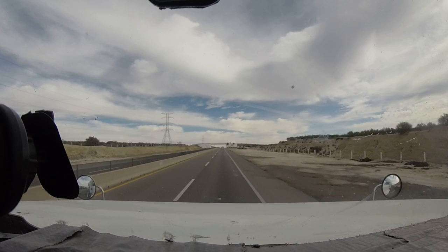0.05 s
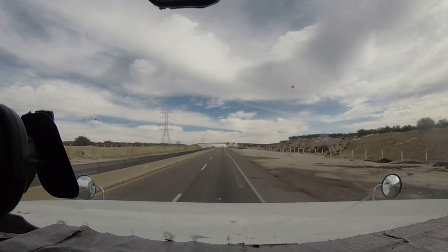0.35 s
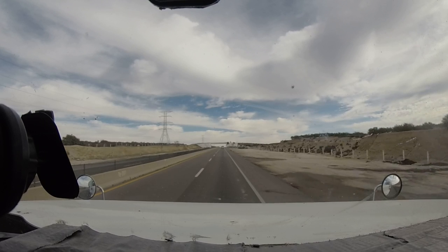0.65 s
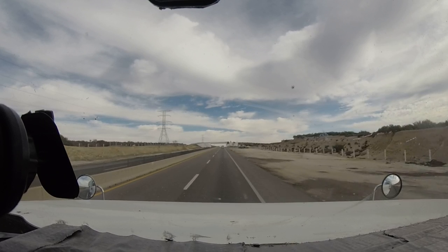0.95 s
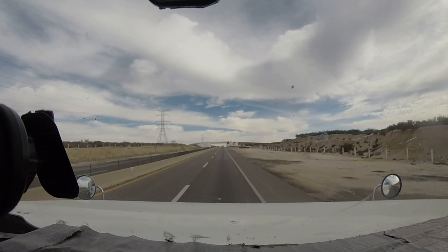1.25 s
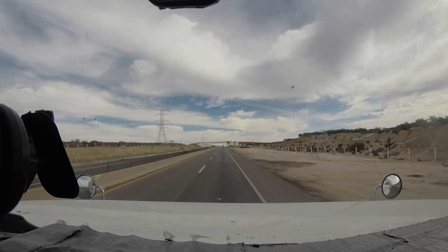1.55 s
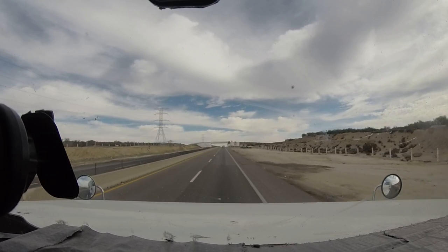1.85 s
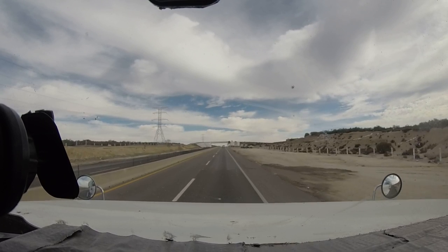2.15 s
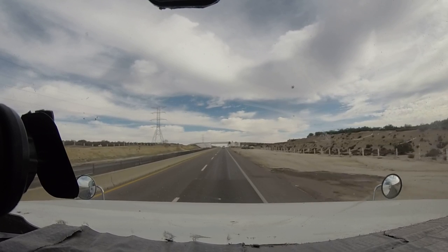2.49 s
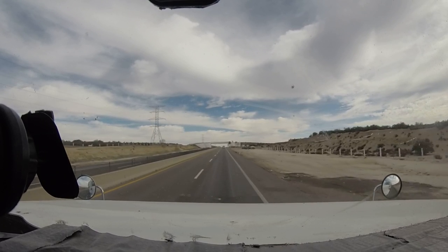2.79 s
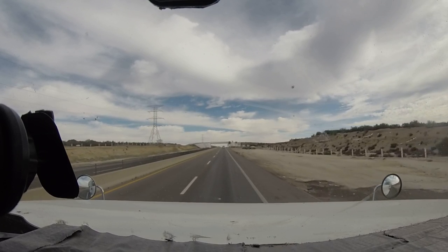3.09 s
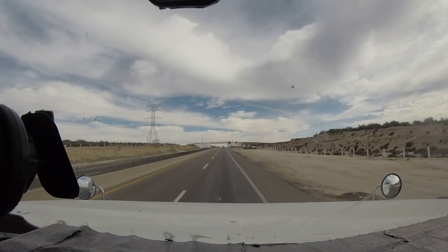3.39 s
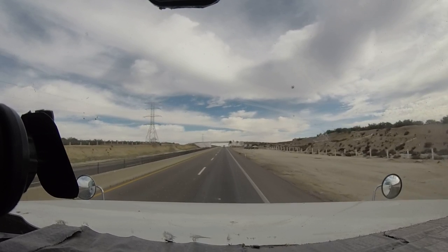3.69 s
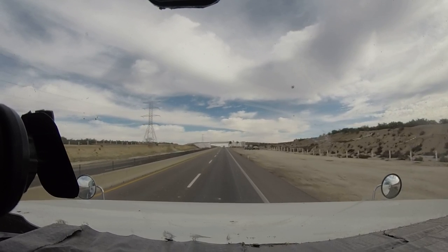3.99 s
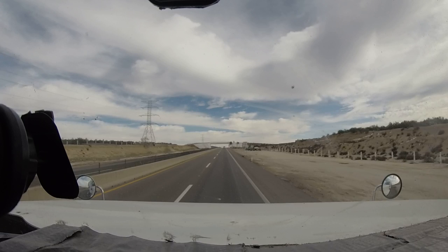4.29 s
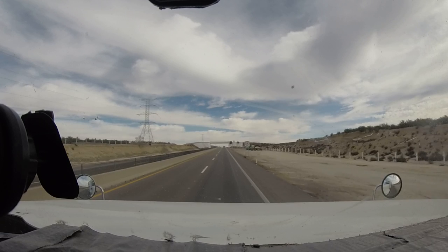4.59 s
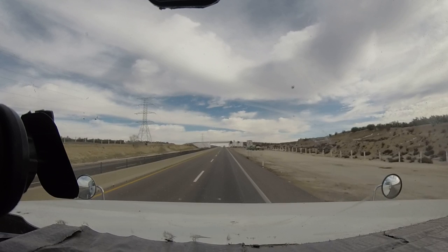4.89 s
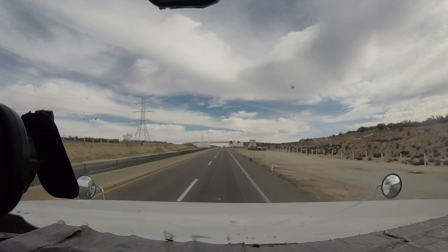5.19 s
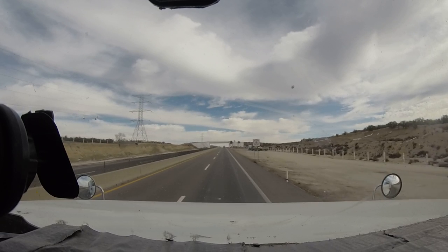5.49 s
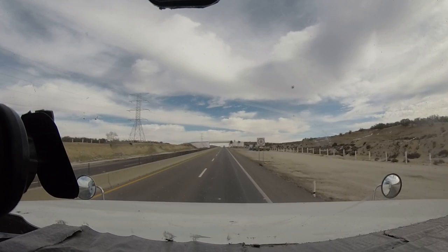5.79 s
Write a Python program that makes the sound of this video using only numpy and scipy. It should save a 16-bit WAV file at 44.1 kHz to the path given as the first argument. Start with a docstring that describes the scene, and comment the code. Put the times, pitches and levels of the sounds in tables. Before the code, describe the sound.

Inside a truck on a highway, a throbbing diesel pulls, chuffs through a gear change and resumes lower, with light trim rattles.

```python
"""A six-cylinder diesel throbs under load, heard from inside the cab of a heavy truck.
Its harmonics and combustion noise excite resonances of the cab, under the thin whistle of turbo blades.
For an upshift the fuel is cut, the engine brake chuffs through the exhaust pipe and the turbo runs down;
then the engine pulls again, slower. Loose trim ticks, rattles and squeaks, and underneath
the road rumbles, the tyres roar and air hisses."""
import sys
import numpy as np
from scipy import signal
from scipy.fft import rfft, irfft
from scipy.io import wavfile
from scipy.ndimage import uniform_filter1d

SR = 44100
rng = np.random.default_rng(int(sys.argv[2]) if len(sys.argv) > 2 else 0)


def store_pcm(level_fs):
    """Save levels as 16-bit WAV."""
    pcm = np.round(np.clip(level_fs, -1, 1) * 32767).astype(np.int16)
    wavfile.write(sys.argv[1], SR, np.atleast_2d(pcm).T)


N = 266805
TIME_S = np.arange(N) / SR

CYLINDERS = 6
LOW_GEAR_HZ, HIGH_GEAR_HZ = 72.92, 64.45  # firing rate at the start of each gear
CUT_S, RESUME_S = 4.07, 4.8  # fuel off, fuel on again


def engine_hum(cycle, firing_hz):
    """Harmonics of the engine cycle swell near the cab's air modes; orders 5 and 6 beat into a throb."""
    # strong harmonics: multiple of the cycle rate
    strong_orders = (5, 6, 12, 36)
    # their strengths before resonance: level_db, fuel_cut_change_db, high_gear_change_db, cut_fade_s
    strong_levels = [(-31.5, 5, -2.5, 0.16), (-24, -19, -2.5, 0.034), (-32.5, -12.5, -2.5, 0.22),
                     (-42.5, -4, -2.5, .3)]
    # weak harmonics from unequal cylinders: multiple of the cycle rate
    weak_orders = (2, 3, 4, 7, 9, 10, 14, 15, 16, 17, 18, 19, 20, 24)
    # their strengths under power: low_gear_db, high_gear_db
    weak_levels = [(-56.5, -35), (-47, -44), (-33, -36.5), (-44, -40), (-34.5, -29), (-33.5, -40),
                   (-36.5, -32), (-49, -31), (-50, -42.5), (-41, -47), (-40, -27.5), (-47, -43), (-43, -42),
                   (-34, -43.5)]
    # air resonances of the cab: centre_hz, width_hz, lift_db
    cab_modes = [(62.2, 21.3, 9), (147, 35, 16), (445.6, 28, 18.5)]
    shifted, cycle_hz = high_gear(), firing_hz / CYLINDERS
    strong, weak = np.zeros(N), np.zeros(N)
    for order, (db, cut_db, shift_db, fade_s) in zip(strong_orders, strong_levels):
        source_db = db + cut_db * fuel_cut(fade_s) + shift_db * shifted
        boom_db = resonance_db(order * cycle_hz, cab_modes)
        strong += gain_of(source_db + boom_db) * harmonic(order * cycle, waver_db=.5)
    for order, (low_db, high_db) in zip(weak_orders, weak_levels):
        level_db = low_db + (high_db - low_db) * shifted
        weak += gain_of(level_db) * harmonic(order * cycle + rng.random(), waver_db=2)
    return strong + gain_of(-10 * fuel_cut()) * weak


def combustion_roar(cycle):
    """Forced vibration: combustion noise, partly alike in every cycle, pulses and rings the cab panels."""
    # combustion spectrum: frequency_hz, relative_db
    spectrum = [(60, -2.5), (115, -4), (165, -4.5), (220, 4), (270, -6), (340, 2), (400, -4), (470, -9),
                (540, -3), (740, -5.5), (1000, -9.5), (1200, -11), (1450, -16), (2000, -31), (4000, -50)]
    # panel resonances: centre_hz, width_hz, low_gear_lift_db, high_gear_lift_db
    panels = [(207, 38, 1.5, 3.5), (619, 44, 1.5, 3), (734, 34, 6, 3.5), (863, 63, 12.5, 11.5),
              (919.6, 20, 9.5, 9.5), (1045, 34, 4, 4.5), (1416, 200, 2, 4)]
    points, repeat_share = 3600, .37  # noise points per cycle; share of the power that repeats
    pattern = unit_rms(np.interp(cycle % 1 * points, np.arange(points), rng.standard_normal(points)))
    drive = np.sqrt(repeat_share) * pattern + np.sqrt(1 - repeat_share) * noise()
    drive *= 3.2 + firings(cycle, decay=.6, uneven_db=2.2)
    low = colour(drive, spectrum, [(hz, width, db) for hz, width, db, _ in panels])
    high = colour(drive, spectrum, [(hz, width, db) for hz, width, _, db in panels])
    return low + (high - low) * high_gear()


def firings(cycle, decay, uneven_db):
    """Pulse envelope: each cylinder's blow has its own strength and decays over a share of its stroke."""
    strength = gain_of(uneven_db * unit_rms(noise(CYLINDERS)))
    count = cycle * CYLINDERS
    return unit_rms(strength[count.astype(int) % CYLINDERS] * np.exp(-(count % 1) / decay))


def firing_rate():
    """Firings per second follow crankshaft speed, climbing in each gear and dropping between them."""
    low_climb, drop, high_climb = 1.35, 24, .9  # Hz per s
    low = LOW_GEAR_HZ + low_climb * TIME_S - drop * since(CUT_S)
    return np.maximum(low, HIGH_GEAR_HZ + high_climb * since(RESUME_S))


def fuel_cut(fade_s=.12):
    """A ramped gate: one while the fuel is off for the shift, zero under power."""
    resume_fade_s = .5
    return np.minimum(since(CUT_S) / fade_s, 1) - np.minimum(since(RESUME_S) / resume_fade_s, 1)


def high_gear():
    """Crossfade weight: zero in the low gear, near one at the engine's high-gear speed."""
    return np.clip((LOW_GEAR_HZ - firing_rate()) / (LOW_GEAR_HZ - HIGH_GEAR_HZ), 0, 1)


def engine_brake(cycle):
    """A falling pipe resonance turns a whoosh into a thump, among smaller puffs and a gasp of air."""
    # main exhaust burst: time_s, pitch_hz, level_db
    whoosh = [(4.3, 460, -90), (4.35, 440, -29), (4.425, 400, -25), (4.45, 360, -15.5), (4.467, 265, -17),
              (4.49, 188, -10.5), (4.515, 150, -17), (4.56, 115, -20), (4.6, 100, -36), (4.65, 110, -90)]
    # exhaust puffs: centre_s, level_db, pitch_hz, half_length_s, sag_octaves_per_s, note_over_flutter_db
    puffs = [(4.255, -22.5, 430, .05, 1, -3), (4.41, -26, 640, .03, 4, -6), (4.497, -20, 300, .03, 4, -3),
             (4.48, -21, 115, .04, 3, -3), (4.568, -23, 450, .014, 2, 3), (4.603, -21, 205, 0.03, 1, 4),
             (4.812, -15, 100, .035, 5, 0)]
    # spectrum of the released air: frequency_hz, relative_db
    gasp_spectrum = [(1000, -15), (2500, 0), (4500, 0), (6500, -5), (9000, -10), (11000, -17), (13500, -22),
                     (15000, -40)]
    drive = (1 + firings(cycle, decay=.3, uneven_db=2)) * noise()
    sweep_hz, sweep_db = curves(whoosh)
    exhaust = gain_of(sweep_db) * pipe_note(drive, sweep_hz, note_db=5)
    for centre_s, db, pitch_hz, half_s, sag, note_db in puffs:
        offset_s = np.clip(TIME_S - centre_s, -2 * half_s, 2 * half_s)
        puff = pipe_note(drive, pitch_hz * 2 ** (-sag * offset_s), note_db)
        exhaust += gain_of(db) * bell(centre_s, half_s) * puff
    gasp = gain_of(-47.5) * bell(centre_s=4.468, half_s=.06) * colour(noise(), gasp_spectrum)
    return exhaust + gasp


def pipe_note(drive, hz, note_db):
    """Exhaust pulses excite a moving pipe resonance: a dull flutter around a clear note."""
    flutter = resonate(resonate(drive, hz, width_hz=190), hz, width_hz=150)
    flutter = low_pass(flutter, top_hz=1200)
    flutter /= np.sqrt(uniform_filter1d(flutter ** 2, size=900) + 1e-12)  # steadies the level
    note = gain_of(note_db) * np.sqrt(2) * np.sin(2 * np.pi * (np.cumsum(hz) / SR + rng.random()))
    return unit_rms(flutter + note)


def turbo():
    """Two wheels on one shaft whistle at their blade-passing rates, over the air in the intake."""
    # compressor tone as the shaft climbs, coasts, is kicked by the brake and spools up: time_s, pitch_hz
    blade_tone = [(0, 8005), (1.5, 8185), (2.5, 8275), (3.55, 8335), (4.09, 8195), (4.2, 7620), (4.3, 7090),
                  (4.4, 6650), (4.46, 6560), (4.51, 6720), (4.58, 6230), (4.7, 5800), (5, 5170),
                  (5.15, 4950), (5.35, 4840), (5.55, 4940), (5.8, 5200), (6.05, 5520)]
    # whistle strengths: time_s, compressor_db, turbine_db
    levels = [(0, -64, -84), (.45, -60, -82), (.75, -62, -82), (1.5, -56.5, -81), (2.7, -58, -80),
              (3.1, -60.5, -80), (3.45, -56, -78.5), (3.85, -56.5, -79), (4.2, -59, -75.5),
              (4.45, -60, -72.5), (4.75, -63.5, -73), (5, -63, -76), (5.2, -63, -70), (5.55, -61.5, -67),
              (6.05, -60, -71)]
    compressor_blades, turbine_blades = 6, 10
    compressor_db, turbine_db = curves(levels)
    shaft_hz = curves(blade_tone)[0] / compressor_blades
    boost = shaft_hz / shaft_hz.max()
    jitter = .0003 + .007 * (1 - boost)  # the shaft is less steady as boost is lost
    shaft_hz *= 1 + jitter * drift(rate_hz=45)
    shifted = high_gear()
    compressor = whistle(compressor_blades * shaft_hz, .5 + .5 * fuel_cut() + .8 * shifted, width_hz=230)
    turbine = whistle(turbine_blades * shaft_hz, breath=5 - 3.5 * shifted, width_hz=420)
    return gain_of(compressor_db) * compressor + gain_of(turbine_db) * turbine + intake(boost)


def whistle(hz, breath, width_hz):
    """A blade tone in a breathy noise band fades in and out as the shaking cab shifts its echoes."""
    fading = 1 + .42 * drift(rate_hz=14)
    tone = unit_rms(np.sin(2 * np.pi * np.cumsum(hz) / SR) * fading)
    skirt = unit_rms(resonate(resonate(noise(), hz, width_hz), hz, width_hz))
    return (tone + breath * skirt) / np.sqrt(1 + breath ** 2)


def intake(boost):
    """Flow noise grows with turbo speed, and the intake pipe resonates as the boost escapes."""
    # spectrum of the rushing boost air: frequency_hz, relative_db
    spectrum = [(2500, -21), (4000, -1.5), (4800, 4), (5700, -8), (6800, -0.5), (8000, -4.5), (8900, -9),
                (9400, -9), (10500, -16.5), (12500, -24.5), (13700, -20), (15000, -28.5)]
    rush = gain_of(-58.5 + 25 * np.log10(boost)) * colour(noise(), spectrum)
    surge = swell(peak_s=4.6, rise_s=.15, fall_s=.1)  # just after the brake bites
    escape = gain_of(-58) + gain_of(-53.5) * (1 - boost) + gain_of(-54) * surge
    return rush + escape * unit_rms(band(noise(), hz=3235, octaves=.045))


def trim_ticks():
    """Impacts on hard plastic: each gives a brief crack and excites damped modes."""
    # impacts: start_s, level_db, tilt_db_per_octave
    ticks = [(3.199, -40, 3), (3.212, -30.5, 6), (3.636, -31, 0), (4.161, -39, 5), (4.331, -37, -1),
             (4.504, -33.5, 2), (4.537, -38, -1), (4.597, -38, 0), (4.795, -41, -2), (4.9145, -22.5, -5),
             (5.034, -34, -4), (5.199, -32, 3), (5.380, -34, -2), (5.510, -32.5, -3)]
    # modes of the plastic: pitch_hz, relative_db, t60_s
    modes = [(1800, 0, .014), (2120, 3.5, .017), (2390, 0, .018), (2700, -5, .014), (3050, -6, .012),
             (3420, -1, .014), (3680, 1.5, .016), (4200, -8, .011), (5000, -9.5, .01), (5900, -14, .008),
             (7600, -17, .009), (9300, -26, .008)]
    out, t = np.zeros(N), TIME_S[:SR // 8]
    attack = 1 - np.exp(-t / .0002)
    for start_s, db, tilt in ticks:
        ring = np.zeros(len(t))
        for hz, mode_db, t60_s in modes:
            envelope = gain_of(mode_db + tilt * np.log2(hz) - 60 * t / t60_s)
            detuned_hz = hz * rng.uniform(.923, 1.03)
            ring += envelope * np.sin(2 * np.pi * detuned_hz * t) * rng.choice([-1, 1])
        crack = unit_rms(band(noise(len(t)), hz=3100 * 2 ** (tilt / 12), octaves=.55))
        tick = gain_of(3.5) * ring / abs(ring).max() + gain_of(-6) * crack * np.exp(-t / .0025)
        add(out, start_s, gain_of(db) * tick * attack)
    return out


def trim_rattles():
    """Clumps of tiny random impacts excite the resonances of loose trim."""
    # bursts of shaking: start_s, level_db, length_s, centre_hz, top_hz
    rattles = [(0.991, -44.5, .025, 5000, 10000), (1.073, -43, 0.019, 4770, 10000),
               (1.423, -48, .02, 5000, 9000), (1.519, -49, 0.023, 5200, 9000),
               (1.55, -46, 0.022, 5200, 9000), (2.637, -42, 0.038, 4700, 9500),
               (3.213, -46, .012, 8500, 15000), (3.383, -44, 0.037, 4800, 10000),
               (3.461, -43, 0.031, 2100, 10000), (3.53, -48, .02, 5000, 10000),
               (3.57, -44, .025, 5200, 10000), (3.63, -43, .025, 3400, 10000),
               (3.977, -39, 0.04, 5000, 10100), (4.034, -38.5, 0.038, 4400, 11000),
               (4.078, -31.5, 0.019, 5440, 11500), (4.104, -45, 0.014, 11000, 13000),
               (4.121, -46.5, 0.032, 8000, 12000), (4.248, -41, 0.03, 5360, 9800),
               (5.424, -47, 0.02, 6000, 8200), (5.642, -45, 0.015, 7000, 9800),
               (5.836, -46, .026, 5600, 8500), (5.893, -42, 0.017, 4370, 8500),
               (5.915, -43, 0.024, 6000, 10000)]
    # resonances of the loose parts: centre_hz, width_hz, lift_db
    rings = [(3880, 340, 8), (4860, 400, 6), (7160, 700, 5), (9400, 500, 2)]
    spectrum = [(3000, 11), (9000, -2.5), (11000, -3.5), (15000, -14.5)]  # frequency_hz, relative_db
    impacts_per_s = 4000
    out, t = np.zeros(N), TIME_S[:SR // 8]
    for start_s, db, length_s, centre_hz, top_hz in rattles:
        impacts = noise(len(t)) * (rng.random(len(t)) < impacts_per_s / SR)
        grains = low_pass(band(impacts, centre_hz, octaves=1), top_hz)
        rise = t / (length_s * .35)
        add(out, start_s, gain_of(db) * colour(grains, spectrum, rings) * rise * np.exp(1 - rise))
    return out


def trim_squeaks():
    """Narrow-band noise in very short bursts is heard as small pitched squeaks of the trim."""
    # squeaks: start_s, level_db
    squeaks = [(.44, -50), (.97, -52), (1.92, -53), (2.87, -54), (3.495, -44), (3.657, -49), (3.745, -43),
               (3.905, -46), (4.197, -47)]
    out, t = np.zeros(N), TIME_S[:SR // 8]
    envelope = np.exp(-((t - .005) / .0028) ** 2)
    for start_s, db in squeaks:
        squeak = unit_rms(band(noise(len(t)), hz=6680, octaves=.05))
        add(out, start_s, gain_of(db) * squeak * envelope)
    return out


def road():
    """Surface roughness shakes the cab into a rumble and, less steeply, raises the roar of the tyres."""
    # roughness of the surface: time_s, rumble_db
    roughness = [(0, -32), (.6, -22.5), (1.5, -25), (3, -23), (3.7, -18.5), (4.7, -19.5), (6.05, -22)]
    # spectrum of the shaking cab: frequency_hz, relative_db
    rumble_spectrum = [(5, -33.5), (10, -6.5), (20, 4.5), (35, -1), (56, 6), (80, 0), (120, -1.5),
                       (165, -7), (210, -3), (260, -18), (400, -39), (900, -78.5)]
    # spectrum of the rolling tyres: frequency_hz, relative_db
    tyre_spectrum = [(150, -20), (220, -16), (280, 0.5), (380, 2), (455, 8), (540, -1.5), (630, -0.5),
                     (800, -5), (980, -8), (1120, -6.5), (1350, -23.5), (1700, -34.5), (4000, -63)]
    rumble_db, = curves(roughness)
    tyre_db = -26 + .52 * (rumble_db - rumble_db.mean())
    rumble = gain_of(rumble_db) * colour(noise(), rumble_spectrum)
    return rumble + gain_of(tyre_db) * colour(noise(), tyre_spectrum)


def air_hiss(cycle):
    """Broadband air noise flickers, lightly amplitude-modulated by each firing."""
    # spectrum of the air noise: frequency_hz, relative_db
    spectrum = [(700, -19), (1400, -4), (1800, 5), (2100, -0.5), (2600, 0), (2950, -7.5), (3500, -6),
                (4300, -12.5), (4800, -14), (6000, -18), (7800, -25), (10000, -32.5), (12500, -38),
                (15000, -56.5)]
    air = unit_rms(noise() * (5 + firings(cycle, decay=.3, uneven_db=5)))
    return colour(air * gain_of(.5 * drift(rate_hz=25)), spectrum)


def harmonic(turns, waver_db):
    """A sinusoid with slow random amplitude modulation."""
    return np.sqrt(2) * np.cos(2 * np.pi * turns) * gain_of(waver_db * drift(rate_hz=4.9))


def resonance_db(hz, peaks):
    """Summed lift of bell-shaped resonance peaks at the frequencies hz."""
    return sum(lift_db / (1 + (2 * (hz - centre) / width) ** 2) for centre, width, lift_db in peaks)


def colour(x, spectrum, peaks=()):
    """Spectral shaping with resonant peaks and a steep roll-off past the last point, at unit rms."""
    hz = np.fft.rfftfreq(len(x), 1 / SR)
    point_hz, point_db = np.transpose(spectrum)
    shape_db = np.interp(np.log(hz + 1), np.log(point_hz + 1), point_db)
    shape_db -= 60 * np.log10(np.maximum(hz / point_hz[-1], 1))
    return unit_rms(irfft(rfft(x) * gain_of(shape_db + resonance_db(hz, peaks)), len(x)))


def resonate(x, hz, width_hz):
    """A resonator of unit gain whose centre frequency moves."""
    carrier = np.exp(2j * np.pi * np.cumsum(hz) / SR)
    pole = np.exp(-np.pi * width_hz / SR)
    return 2 * (carrier * signal.lfilter([1 - pole], [1, -pole], x / carrier + 1e-18)).real


def band(x, hz, octaves):
    """A Gaussian band-pass on a log-frequency axis."""
    bin_hz = np.fft.rfftfreq(len(x), 1 / SR) + 1
    return irfft(rfft(x) * np.exp(-.5 * (np.log2(bin_hz / hz) / octaves) ** 2), len(x))


def low_pass(x, top_hz, order=10):
    """Rolls off by 6 dB per octave per order above top_hz."""
    hz = np.fft.rfftfreq(len(x), 1 / SR)
    return irfft(rfft(x) / (1 + (hz / top_hz) ** order), len(x))


def drift(rate_hz):
    """Low-passed noise: a random wandering of unit rms."""
    return unit_rms(low_pass(noise(), rate_hz, order=4))


def noise(samples=N):
    """Gaussian white noise."""
    return rng.standard_normal(samples)


def curves(rows):
    """Linear interpolation of each column of a timed table to the sample rate."""
    time_s, *columns = np.transpose(rows)
    return [np.interp(TIME_S, time_s, column) for column in columns]


def since(start_s):
    """Seconds elapsed from start_s, zero before it."""
    return np.maximum(TIME_S - start_s, 0)


def swell(peak_s, rise_s, fall_s):
    """Exponential growth to one at peak_s, then exponential decay."""
    offset_s = TIME_S - peak_s
    return np.exp(np.minimum(offset_s / rise_s, -offset_s / fall_s))


def bell(centre_s, half_s):
    """A Gaussian envelope in time."""
    return np.exp(-((TIME_S - centre_s) / half_s) ** 2)


def gain_of(db):
    """Decibels to amplitude."""
    return 10 ** (np.asarray(db) / 20)


def unit_rms(x):
    """Scales to an rms of one."""
    return x / np.sqrt(np.mean(x ** 2) + 1e-20)


def add(mix, start_s, sound):
    """Superposes a sound on the mix from start_s."""
    part = mix[round(start_s * SR):][:len(sound)]
    part += sound[:len(part)]


def scene():
    """Superposition of all sources at the windscreen; combustion roar and hiss follow the engine load."""
    # how hard the engine works: time_s, load_db
    load = [(0, -1), (.5, -0.5), (1.9, 0.03), (2.2, -0.25), (3, 0), (3.35, 1), (3.8, 1.5), (4.06, 2),
            (4.35, -1.5), (5.25, -2), (5.5, 1), (6.05, 1.5)]
    load_db, = curves(load)
    firing_hz = firing_rate()
    cycle = np.cumsum(firing_hz) / SR / CYLINDERS  # engine cycles elapsed
    engine = engine_hum(cycle, firing_hz) + gain_of(1.55 * load_db - 22) * combustion_roar(cycle)
    engine += engine_brake(cycle)
    air = gain_of(1.3 * load_db - 41.5) * air_hiss(cycle) + turbo()
    return (engine + air + road() + trim_ticks() + trim_rattles() + trim_squeaks())[None]


def record(dry):
    """Band limiting: a linear-phase low-pass removes the highest treble."""
    edge_hz = 15100
    taps = signal.firwin(511, edge_hz, window=("kaiser", 9), fs=SR)
    return signal.oaconvolve(dry, taps[None], "same")


dry = scene()
out = record(dry)
store_pcm(out)
```